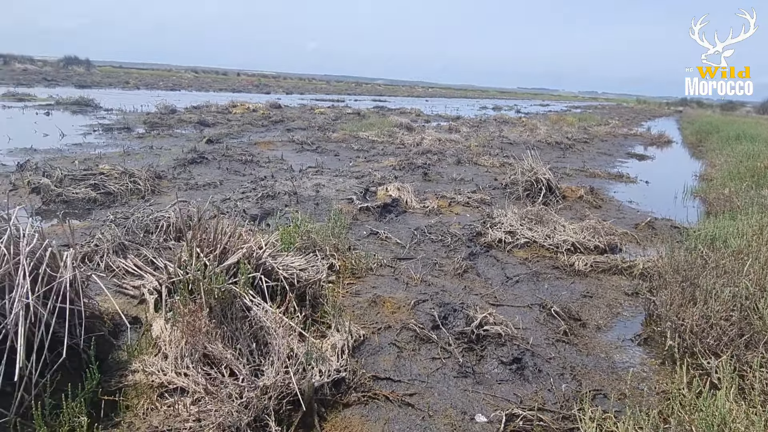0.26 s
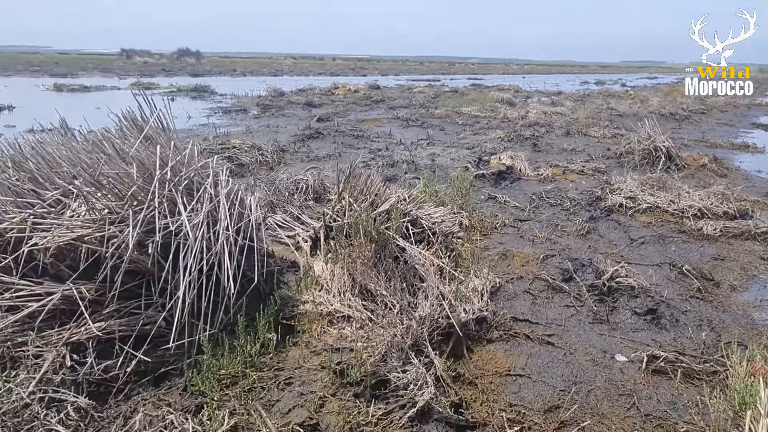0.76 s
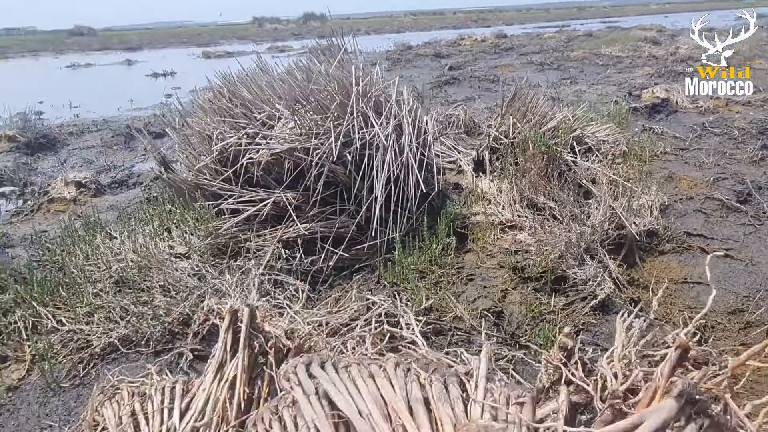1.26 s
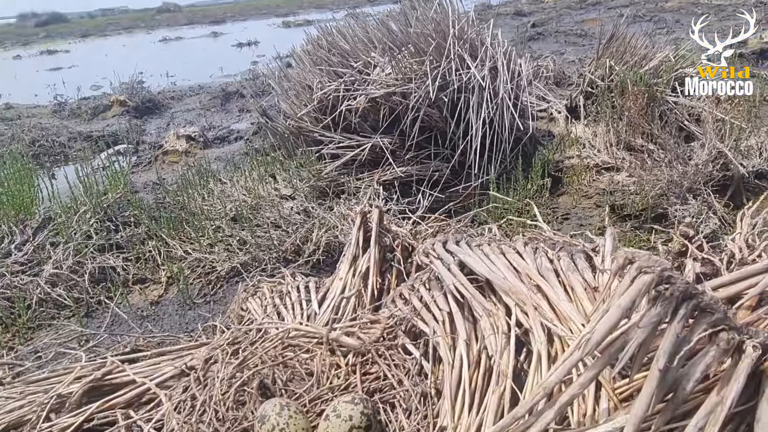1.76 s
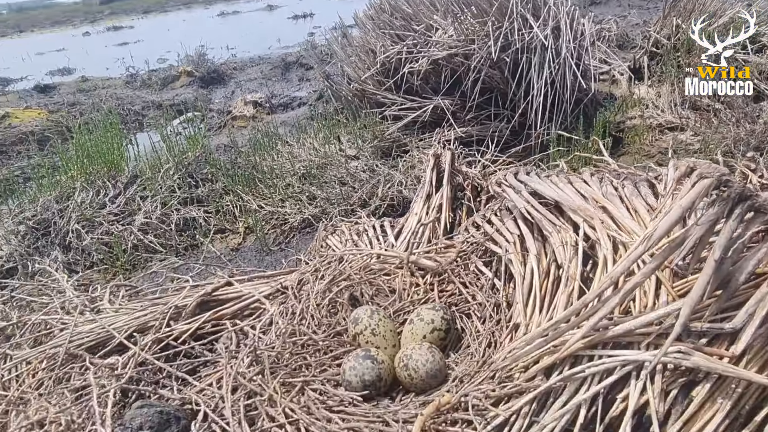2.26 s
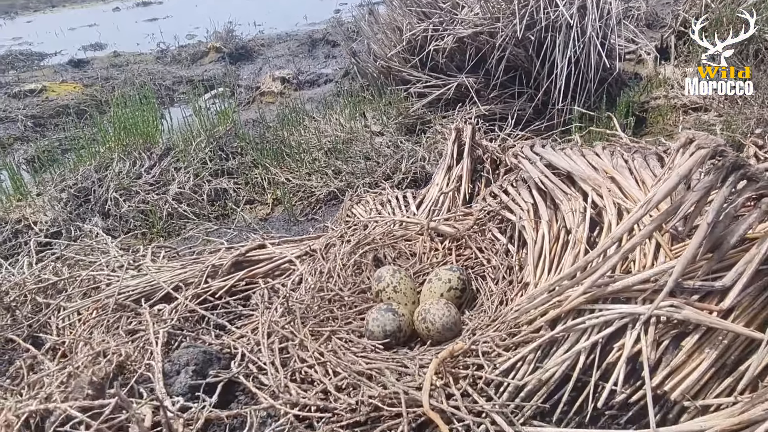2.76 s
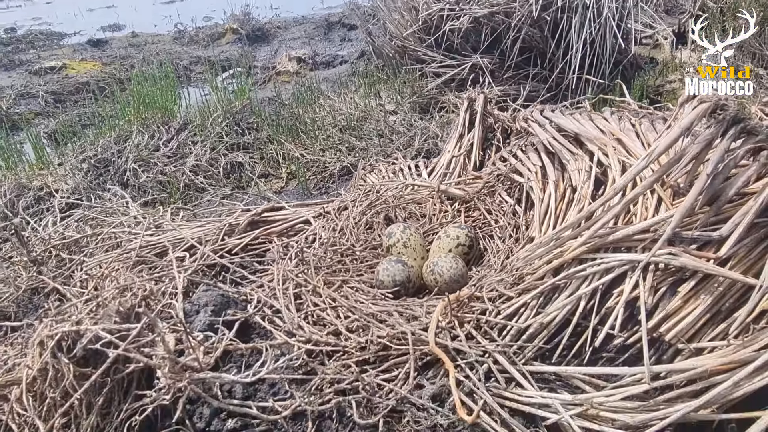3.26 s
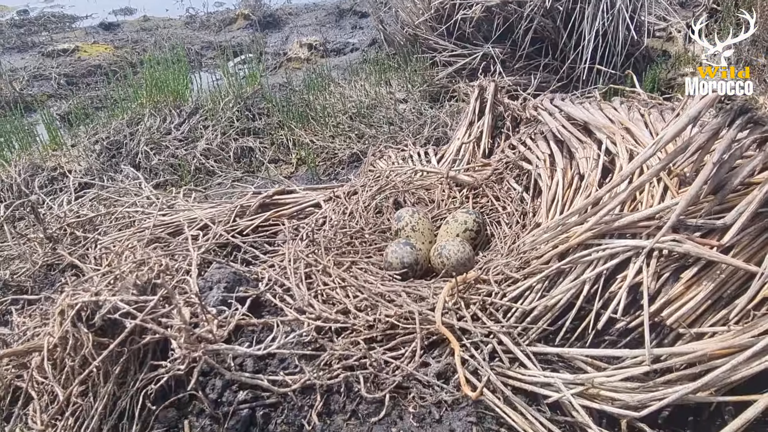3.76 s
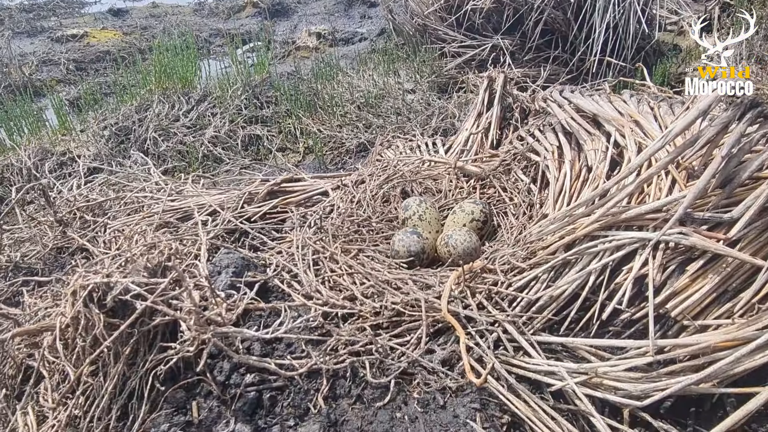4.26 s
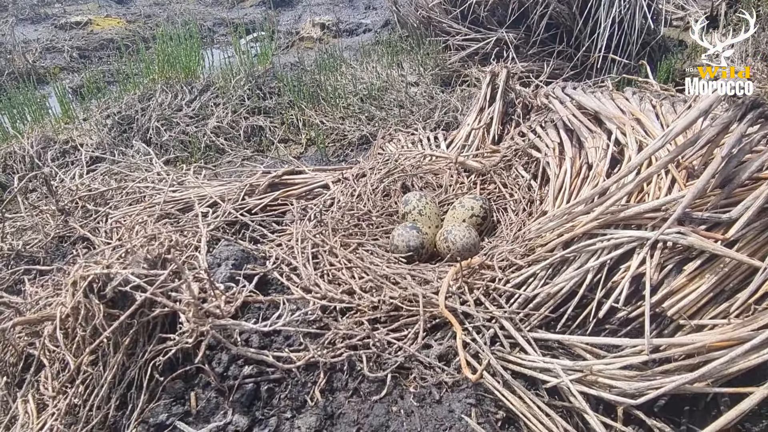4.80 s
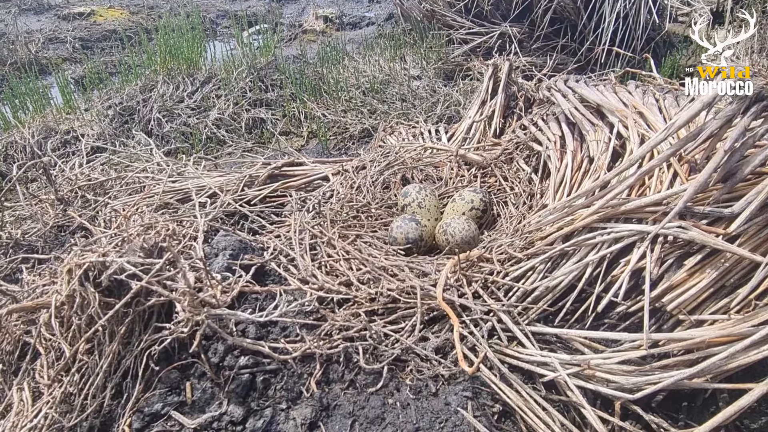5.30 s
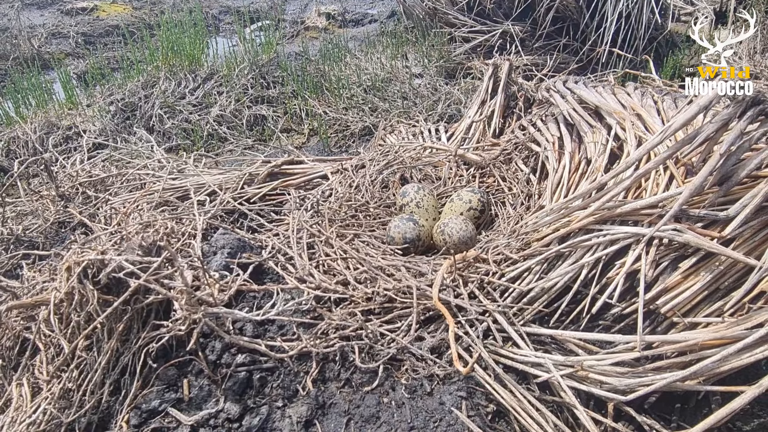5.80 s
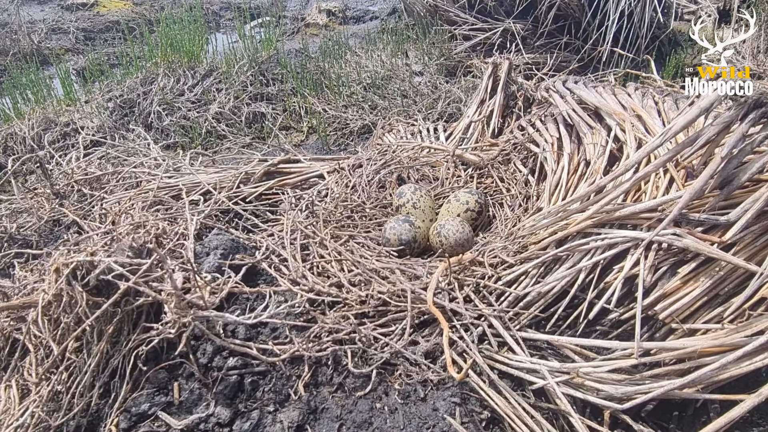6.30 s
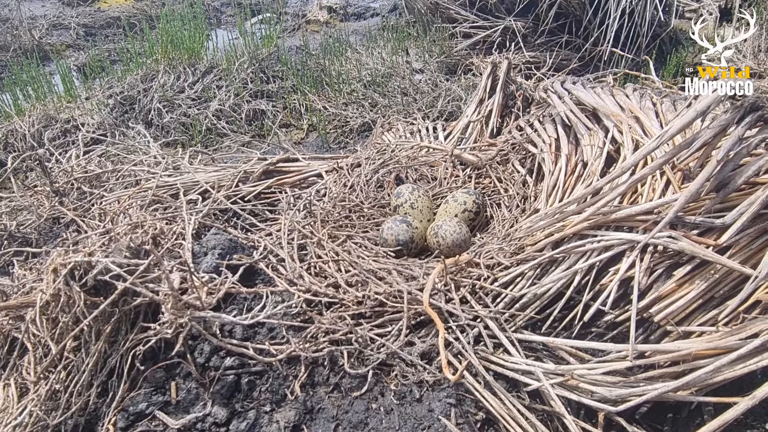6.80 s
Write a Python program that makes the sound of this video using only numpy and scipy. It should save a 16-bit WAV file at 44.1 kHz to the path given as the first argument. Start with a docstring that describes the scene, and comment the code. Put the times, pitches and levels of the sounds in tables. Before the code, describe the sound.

Across seven seconds in an open marsh, deep wind rumble and blunt buffets strike a hand-held microphone, strongest in the first 0.6 seconds, around 1.4 and 4.6, mostly on the right, easing between and towards the end. A lapwing straight ahead gives wheezy, nasal cries at about 0.4, 1.4, 2.0, 3.2, 5.0 and 5.6 seconds; each starts scratchy, arches in pitch and breaks into a brief rattle. Short falling croaks follow the first, third, fourth and fifth; the last cry is longest, rising again before its break. A farther wader repeats a thin whistle, quickly sliding down to a held note, roughly every half second with gaps near 3.4 and 5.3. Tiny birds chirp faintly, clearest at 5.6. Two dry ticks come at 2.1, soft low knocks at 2.3 and 2.4. Faint hiss switches on and off; reeds and mud slightly blur the calls.

```python
"""A lapwing gives six wheezy, arching cries over a marsh: harmonics that roughen into a rattle, four trailed by croaks.
A farther wader repeats a down-slurred whistle, a gliding sine; small birds chirp thinly, as bent and buzzing tones.
Wind rumbles and buffets in the two ports of a hand-held microphone, as shaped noise; far air is noise too.
Bands of recorder hiss switch on and off; there are two dry ticks and two low, short knocks.
Reeds and mud banks blur the birds."""
import sys
import numpy as np
from scipy import signal
from scipy.fft import rfft, irfft, next_fast_len
from scipy.io import wavfile
from scipy.ndimage import uniform_filter1d

SR = 44100
rng = np.random.default_rng(int(sys.argv[2]) if len(sys.argv) > 2 else 0)


def output_pcm(signal):
    """Save a mono or channel-first signal as 16-bit PCM at the path in sys.argv[1].

    Samples are clipped to [-1, 1] before scaling.
    """
    pcm = np.clip(np.atleast_2d(signal).T, -1, 1) * 32767
    wavfile.write(sys.argv[1], SR, np.round(pcm).astype(np.int16))


N = 310905


def gain_of(db):
    """Decibels to amplitude."""
    return 10 ** (np.asarray(db) / 20)


def evened(x):
    """Scales to rms 1."""
    return x / np.sqrt(np.mean(x ** 2) + 1e-20)


def read(points, hz):
    """A spectrum's gain at hz, interpolated in dB on a log-frequency axis."""
    f, db = np.transpose(points)
    return gain_of(np.interp(np.log(hz + 1), np.log(f), db))


def add(mix, start_s, sound):
    """Mixes a sound in at start_s, cropped to the mix."""
    at = round(start_s * SR)
    sound = sound[max(-at, 0):]
    part = mix[max(at, 0):][:len(sound)]
    part += sound[:len(part)]


def noise(size, colour):
    """Noise of rms 1 whose spectrum is colour(Hz)."""
    n = next_fast_len(size + 2048)
    spectrum = rfft(rng.standard_normal(n)) * colour(np.fft.rfftfreq(n, 1 / SR))
    return evened(irfft(spectrum, n)[:size])


def wander(size, hz):
    """Smooth random curve of rms 1, up to about hz."""
    return noise(size, lambda f: np.exp(-(f / hz) ** 2))


def fade(t, rise_s, fall_s):
    """Linear fade in and out."""
    return np.clip((t - t[0]) / rise_s, 0, 1) * np.clip((t[-1] - t) / fall_s, 0, 1)


def phase_of(hz):
    """Phase [rad] of a varying frequency."""
    return 2 * np.pi * np.cumsum(hz) / SR


def spells(events, rise_s, sag_db, fall_s):
    """Amplitude over time of events (start [s], length [s], level [dB]) that rise, sag and fall."""
    out = np.zeros(N)
    for start_s, length_s, db in events:
        t = np.arange(0, length_s, 1 / SR)
        add(out, start_s, gain_of(db + sag_db * t / length_s) * fade(t, rise_s, fall_s))
    return out


def recorder_hiss(edge_s=0.017, sag_db=-5):
    """Bands of recorder hiss that switch on and off with short fades, sagging meanwhile; alike in both channels."""
    # hiss spectrum: (frequency [Hz], relative density [dB])
    hiss_bands = [(1000, -27), (1400, 3.5), (2000, -1), (3600, -1.5), (4700, -3.5), (5700, 2.5),
                  (6900, 0.5), (7700, -19.5), (12000, -33.5)]
    # times when the hiss is on: (start [s], length [s], level [dB])
    openings = [(1.2, 0.38, -73), (2.77, 0.069, -79), (3.99, .29, -80), (4.55, 0.34, -79),
                (5.65, 0.67, -72.5), (6.41, 0.64, -69.5)]
    gain = spells(openings, edge_s, sag_db, edge_s) * gain_of(1.5 * wander(N, 30))
    return noise(N, lambda f: read(hiss_bands, f)) * gain


def marsh(air_db=-53, shared_hz=2200, shared_max=0.69):
    """Far air, unrelated between the ports in the bass and partly shared in the treble."""
    # open marsh spectrum: (frequency [Hz], relative density [dB])
    air_colour = [(30, 1), (80, -2), (250, -10.5), (500, -19), (1000, -25), (1900, -34), (2700, -36),
                  (4200, -41), (6500, -43.5), (7800, -48), (15000, -47)]
    f = np.fft.rfftfreq(N, 1 / SR)
    z = rfft(rng.standard_normal((3, N)))
    shared_power = shared_max * f ** 2 / (f ** 2 + shared_hz ** 2)
    mixed = z[:2] * np.sqrt(1 - shared_power) + z[2] * np.sqrt(shared_power)
    air = evened(irfft(mixed * read(air_colour, f), N))
    swell_db = 0.8 * wander(N, 5)
    return air * gain_of(air_db + swell_db)


def port_wind(port, gust_rise_s=0.023, gust_sag_db=-3, gust_fall_s=0.044):
    """Wind strength [dB] at one port over time: gusts ride on the breeze, added in power."""
    # breeze between gusts: (time [s], left strength [dB], right strength [dB])
    breeze_points = [(-0.0, -38, -27), (0.66, -39, -33), (1.33, -42, -32), (1.65, -39, -40),
                     (2.05, -56, -47), (2.54, -42, -39), (2.61, -49, -44), (3.11, -47, -40),
                     (3.49, -38, -42), (3.82, -56, -48), (4.05, -42, -31), (4.33, -47, -44),
                     (4.81, -33, -26), (5.56, -46, -37), (6.08, -47, -41), (6.74, -52, -46),
                     (6.95, -47, -48)]
    # gusts: (start [s], length [s], left strength [dB], right strength [dB])
    gust_events = [(-0.01, 0.25, -35, -16), (0.24, 0.34, -29, -19), (0.69, 0.08, -28, -39),
                   (0.86, 0.15, -34, -26), (1.31, 0.12, -42, -16), (1.43, 0.17, -46, -22),
                   (1.71, 0.17, -46, -28), (2.15, 0.24, -46, -31), (2.71, 0.26, -37, -30),
                   (3.36, 0.14, -40, -26), (4.04, 0.18, -26, -34), (4.53, 0.17, -42, -16),
                   (4.77, 0.27, -30, -26), (5.3, 0.13, -35, -29), (5.48, 0.1, -46, -25),
                   (5.71, 0.14, -53, -28), (6.24, 0.18, -36, -33), (6.38, 0.13, -39, -24)]
    s, *breeze_db = np.transpose(breeze_points)
    breeze = gain_of(np.interp(np.arange(N) / SR, s, breeze_db[port]))
    port_gusts = [(start_s, length_s, db[port]) for start_s, length_s, *db in gust_events]
    gusts = spells(port_gusts, gust_rise_s, gust_sag_db, gust_fall_s)
    return 20 * np.log10(np.hypot(breeze, gusts))


def rumble(wind_db, edge_hz=230, edge_wind_db=-31.5, db_per_decade=44, lumps_db=3):
    """Turbulence in one port: the stronger the wind, the smaller the eddies and the higher it reaches."""
    # wind in a port: (frequency [Hz], relative density [dB])
    rumble_colour = [(8, -34), (22, -20), (40, -1), (70, 5), (95, -1.5), (125, -8.5), (200, -11.5),
                     (350, -14.5), (700, -34)]
    f, t, z = signal.stft(rng.standard_normal(N), SR, nperseg=2048, noverlap=1536)
    f = f[:, None]
    frame_db = np.interp(t * SR, np.arange(N), wind_db)
    edge = edge_hz * 10 ** ((frame_db - edge_wind_db) / db_per_decade)
    z *= read(rumble_colour, f) / np.sqrt(1 + (f / edge) ** 6)
    x = signal.istft(z, SR, nperseg=2048, noverlap=1536)[1][:N]
    x /= np.sqrt(uniform_filter1d(x ** 2, size=2500) + 1e-20)  # flatten the level before shaping it
    return x * gain_of(wind_db) * evened(gain_of(lumps_db * wander(N, 11.8)))


def wind(rumble_db=0.42, leak_db=-9.0, leak_hz=190, spikes_db=4, eddy_low_hz=170):
    """Rumble and spiky buffets per port, softly clipped; their upper part leaks across, weaker and inverted."""
    # eddies striking a port: (time [s], length [s], level [dB], corner [Hz], port [0 left, 1 right])
    buffets = [(0.041, 0.011, -17, 308, 1), (0.069, 0.057, -14, 460, 1), (0.139, 0.021, -14.5, 408, 1),
               (0.176, 0.019, -11.5, 443, 1), (0.26, 0.013, -28, 370, 1), (0.365, 0.026, -14.5, 377, 1),
               (0.44, 0.096, -19, 240, 1), (0.534, 0.023, -15, 374, 1), (0.653, 0.0093, -41, 585, 1),
               (0.711, 0.019, -38.5, 367, 1), (0.894, 0.018, -33.5, 366, 1), (1.031, 0.0081, -25.5, 320, 1),
               (1.042, 0.0084, -19.5, 720, 0), (1.317, 0.017, -14, 298, 1), (1.353, 0.03, -18, 280, 1),
               (1.444, 0.037, -21.5, 274, 1), (3.118, 0.0075, -35.5, 272, 1),
               (3.346, 0.0087, -33.5, 746, 0), (3.401, 0.015, -44, 386, 1), (4.089, 0.018, -31.5, 310, 0),
               (4.247, 0.0064, -28, 610, 0), (4.548, 0.028, -15, 346, 1), (4.594, 0.027, -15, 306, 1),
               (4.621, 0.014, -14.5, 395, 1), (4.79, 0.032, -21, 181, 1), (5.506, 0.031, -35, 265, 1),
               (5.785, 0.026, -37.5, 213, 1), (6.424, .03, -31, 275, 1), (6.446, 0.0079, -26.5, 774, 0)]
    ports = np.array([gain_of(rumble_db) * rumble(port_wind(port)) for port in range(2)])
    for start_s, length_s, db, corner_hz, port in buffets:
        n = int((length_s + 0.0024) * SR)

        def colour(f):
            low_cut = f ** 2 / (f ** 2 + eddy_low_hz ** 2)
            return low_cut / (1 + (f / corner_hz) ** 2) / np.sqrt(1 + (f / corner_hz / 1.574) ** 7)

        eddy = noise(n, colour) * gain_of(spikes_db * wander(n, 130))
        eddy *= signal.windows.tukey(n, min(0.0082 / length_s, 1))
        add(ports[int(port > 0.5)], start_s - 0.002, gain_of(db) * evened(eddy))
    ports = np.tanh(ports)  # soft overload
    f = np.fft.rfftfreq(N, 1 / SR)
    upper = irfft(rfft(ports) * f ** 4 / (f ** 4 + leak_hz ** 4), N)
    return ports - gain_of(leak_db) * upper[::-1]


def ticks(decay_s=0.00098):
    """Dry bright snaps close by: decaying noise bursts."""
    # (time [s], level before decay [dB])
    snaps = [(2.070, -41), (2.080, -42)]
    colour = [(3000, -32), (5000, 5), (15000, -2)]  # (frequency [Hz], gain [dB])
    out = np.zeros(N)
    t = np.arange(300) / SR
    for start_s, db in snaps:
        burst = noise(len(t), lambda f: read(colour, f))
        add(out, start_s, gain_of(db) * burst * np.exp(-t / decay_s))
    return out


def bent_tones(events, buzz=0.056):
    """Single tones bend through three pitches, blurred by a fast random buzz."""
    out = np.zeros(N)
    for start_s, length_s, first_hz, middle_hz, last_hz, db, rough in events:
        t = np.arange(0, length_s, 1 / SR)
        bend = np.polyfit([0, 0.5, 1], [first_hz, middle_hz, last_hz], 2)
        hz = np.polyval(bend, t / length_s)
        phase = phase_of(hz * (1 + buzz * rough * wander(len(t), 700)))
        tone = np.sin(phase) * gain_of(3.8 * wander(len(t), 70)) * fade(t, length_s / 4, length_s / 4)
        add(out, start_s, gain_of(db) * evened(tone))
    return out


def knocks():
    """Two low, short knocks: brief buzzing tones near 1.5 kHz."""
    # (time [s], length [s], first [Hz], middle [Hz], last [Hz], level [dB], roughness [0-1])
    low_knocks = [(1.005, 0.024, 2070, 2230, 2500, -64, 0.8), (1.213, .2, 5220, 5530, 5430, -73, 0.74),
                  (1.85, 0.11, 3350, 3132, 2900, -76.5, 0.15), (2.493, 0.094, 7500, 6230, 5400, -76, 0.3),
                  (2.608, 0.07, 5900, 6750, 6300, -73, 0.1), (4.438, .18, 2370, 2420, 2370, -78, 0.06),
                  (4.579, 0.079, 7200, 6400, 5630, -71.5, 0.74), (4.752, 0.08, 7200, 6200, 5030, -76.5, .7),
                  (4.932, 0.04, 7200, 6660, 5900, -80, .7), (5.637, 0.081, 5920, 6670, 6320, -55.5, 0.15),
                  (5.84, 0.071, 8000, 6330, 5000, -68, 0.7), (5.96, .1, 5900, 6500, 6600, -71, 0.4),
                  (6.5, 0.16, 4030, 4260, 3930, -74, 0.13), (6.622, .06, 4100, 3700, 3100, -67.5, .1),
                  (6.623, 0.06, 7550, 6550, 5100, -70.5, 0.7), (6.743, 0.11, 4200, 3970, 3220, -76.5, 0.5),
                  (2.319, 0.017, 1460, 1590, 1620, -57.5, 0.9), (2.412, 0.016, 1450, 1470, 1450, -67, .5)][-2:]
    return bent_tones(low_knocks)


def small_birds():
    """Thin chirps: single bent tones."""
    # (time [s], length [s], first [Hz], middle [Hz], last [Hz], level [dB], roughness [0-1])
    chirps = [(1.005, 0.024, 2070, 2230, 2500, -64, 0.8), (1.213, .2, 5220, 5530, 5430, -73, 0.74),
              (1.85, 0.11, 3350, 3132, 2900, -76.5, 0.15), (2.493, 0.094, 7500, 6230, 5400, -76, 0.3),
              (2.608, 0.07, 5900, 6750, 6300, -73, 0.1), (4.438, .18, 2370, 2420, 2370, -78, 0.06),
              (4.579, 0.079, 7200, 6400, 5630, -71.5, 0.74), (4.752, 0.08, 7200, 6200, 5030, -76.5, .7),
              (4.932, 0.04, 7200, 6660, 5900, -80, .7), (5.637, 0.081, 5920, 6670, 6320, -55.5, 0.15),
              (5.84, 0.071, 8000, 6330, 5000, -68, 0.7), (5.96, .1, 5900, 6500, 6600, -71, 0.4),
              (6.5, 0.16, 4030, 4260, 3930, -74, 0.13), (6.622, .06, 4100, 3700, 3100, -67.5, .1),
              (6.623, 0.06, 7550, 6550, 5100, -70.5, 0.7), (6.743, 0.11, 4200, 3970, 3220, -76.5, 0.5),
              (2.319, 0.017, 1460, 1590, 1620, -57.5, 0.9), (2.412, 0.016, 1450, 1470, 1450, -67, .5)][:-2]
    return bent_tones(chirps)


def wader(slur_hz=560, slur_s=0.026, head_s=0.022, lift_hz=55, octave_db=-26, flick_s=0.01,
          flick_hz_per_s=110000):
    """Two quick rising flicks, a slide down onto a pure held note and a small lift at the end."""
    # (time [s], length [s], held pitch [Hz], head level [dB], held level [dB])
    whistles = [(-.005, 0.27, 2176, -57.5, -59.5), (0.527, 0.23, 2200, -55, -63.5),
                (1.018, 0.23, 2213, -70, -64.5), (1.509, 0.31, 2243, -58, -67),
                (2.018, 0.22, 2220, -68, -67.5), (2.49, .25, 2260, -61, -69.5),
                (2.954, 0.21, 2266, -55, -72), (3.829, 0.23, 2270, -51.5, -66),
                (4.264, 0.227, 2238, -52, -62.5), (4.738, 0.24, 2204, -55, -61),
                (5.848, .27, 2190, -74, -68), (6.385, 0.26, 2223, -52.5, -68.5),
                (6.889, 0.25, 2220, -48, -68)]
    # opening flicks: (lead [s], first pitch [Hz], peak against the head level [dB])
    flicks = [(.015, 2460, -8), (0.0097, 2050, -6)]
    out = np.zeros(N)
    for start_s, length_s, held_hz, head_db, held_db in whistles:
        t = np.arange(0, length_s, 1 / SR)
        hz = held_hz + slur_hz * np.exp(-t / slur_s) + lift_hz * (t / length_s) ** 6
        phase = phase_of(hz + 5 * wander(len(t), 80))
        head = np.exp(-(t / head_s) ** 2 / 2)
        db = held_db + (head_db - held_db) * head + 1.9 * wander(len(t), 27)
        tone = np.sin(phase) + gain_of(octave_db) * head * np.sin(2 * phase)
        add(out, start_s, np.sqrt(2) * gain_of(db) * tone * fade(t, 0.0061, 0.004))
        t = np.arange(0, flick_s, 1 / SR)
        for lead_s, first_hz, flick_db in flicks:
            phase = phase_of(first_hz + flick_hz_per_s * t + 100 * wander(len(t), 700))
            flick = np.sin(phase) * fade(t, 0.0052, 0.0007)
            add(out, start_s - lead_s, gain_of(head_db + flick_db) * flick)
    return out


def syrinx(rows, reach_hz, throat_length=1, waver=0.0027, jitter=0.044, rattle_hz=150, rattle_db=8, rasp_db=-6,
           wheeze_db=-35, shimmer_db=1.4, voice_db=-0.5, dulling=0.52):
    """Harmonics through the throat; when rough, the membranes stutter and the tone frays into hiss.

    rows: (time [s], pitch [Hz], body [dB], fundamental [dB], treble [dB], roughness [0-1]), before voice_db."""
    # throat resonances: (frequency [Hz], gain [dB])
    throat = [(1000, -16.5), (2100, -5), (2800, 2.5), (3400, 9.5), (4000, 0), (4550, 0), (4950, -13.5),
              (5800, -7.5), (7400, -7), (8700, -15), (10600, -3), (11900, -6.5), (12700, -11.5),
              (15300, -14)]
    # syrinx spectrum, favouring the third harmonic: (multiple of the pitch, gain [dB])
    overtone_gains = [(2, -2), (3, 8.5), (4, 1.5), (5, 3), (6, 4), (8, 1.5), (14, -21.5)]
    s, *columns = np.transpose(rows)
    t = np.arange(s.min(), s.max(), 1 / SR)
    n = len(t)
    hz, body_db, first_db, treble_db, rough = (np.interp(t, s, c) for c in columns)
    rough = np.clip(rough, 0, 1)
    hz = uniform_filter1d(hz, size=250, mode="nearest")
    reach = reach_hz * (hz / hz.max()) ** dulling  # slack membranes make fewer overtones
    hz = hz * (1 + waver * wander(n, 130) + jitter * rough * wander(n, 450))
    phase = phase_of(hz)

    k = np.arange(2, 15)[:, None]
    weight = read(throat, k * hz * throat_length) * gain_of(np.interp(k, *np.transpose(overtone_gains)))
    weight /= 1 + (k * hz / reach) ** 40
    high = np.clip((k * hz - 4700) / 600, 0, 1)  # crossover from body to treble
    body = weight * (1 - high)
    treble = weight * high
    body /= np.linalg.norm(body, axis=0)
    treble /= np.linalg.norm(treble, axis=0)
    shimmer = gain_of(shimmer_db * np.array([wander(n, 25) for _ in k]))
    overtones = (body * gain_of(body_db) + treble * gain_of(treble_db)) * shimmer * np.cos(k * phase)
    fundamental = gain_of(first_db + shimmer_db * wander(n, 55)) * np.cos(phase)
    tone = np.sqrt(2) * (overtones.sum(0) + fundamental)

    def hiss_colour(f):
        low_cut = f ** 2 / (f ** 2 + 5500 ** 2)
        return read(throat, f) ** 1.3 * low_cut / (1 + (f / reach.min()) ** 20)

    hiss = noise(n, hiss_colour) * gain_of(treble_db + 4.5)
    hiss *= gain_of(wheeze_db) + gain_of(rasp_db) * rough
    stutter = gain_of(rattle_db * rough * (np.tanh(2 * wander(n, rattle_hz)) - 0.32))
    return s.min(), gain_of(voice_db) * (tone + hiss) * stutter * fade(t, 0.001, 0.001)


def cry(pitch, scratch_s, rattle_s, db, swell_db, first_db, treble_db, reach_hz, throat_length):
    """Opens with a scratch, arches in pitch on a clear tone, then breaks into a dying rattle."""
    attack_s, attack_db, release_db_per_s = 0.009, -26, -160
    first_share, treble_share = 0.7, 0.35  # of the effort envelope
    treble_db_per_octave = 19.5  # brightens with pitch
    scratch_rough, rattle_rough, break_s, glide_s = 0.9, 0.95, 0.014, 0.0037
    start_s, end_s = pitch[0][0], pitch[-1][0]
    t = np.arange(0, end_s - start_s, 1 / SR)
    clear_s = end_s - start_s - rattle_s
    hz = np.interp(start_s + t, *np.transpose(pitch))
    hz = uniform_filter1d(hz, size=round(glide_s * SR) + 1, mode="nearest")
    along = np.minimum(t / clear_s, 1)
    broken_s = np.maximum(t - clear_s, 0)
    effort_db = attack_db * np.exp(-t / attack_s) + release_db_per_s * broken_s
    body_db = db + effort_db + swell_db * (along - 0.5)
    low_db = first_db + first_share * effort_db
    bright_db = treble_db + treble_share * effort_db + treble_db_per_octave * np.log2(hz / hz.max())
    rough = scratch_rough * np.maximum(1 - t / scratch_s, 0) + rattle_rough * np.minimum(broken_s / break_s, 1)
    rows = np.transpose([start_s + t, hz, body_db, low_db, bright_db, rough])
    return syrinx(rows, reach_hz, throat_length)


def lapwing(croak_reach_hz=8200):
    """The cries, and the short, duller croaks that trail four of them, each sinking as it dies."""
    # voice per cry, levels before envelope and voice trim: (scratch [s], rattle [s], body [dB], swell [dB],
    # fundamental [dB], treble [dB], overtone reach [Hz], throat length [factor])
    voices = [(0.049, 0.037, -39, -4, -56, -46.5, 11700, 0.99),
              (0.037, 0.059, -42, -1, -48.5, -51, 14000, 1),
              (0.022, .033, -46.5, 8.5, -57.5, -54.5, 12500, 1.04),
              (0.038, 0.051, -46, -10.5, -50, -57.5, 11800, 0.973),
              (0.025, 0.051, -50, -7, -52, -57, 11900, 0.994),
              (0.019, .025, -46, -4, -54.5, -49, 18000, 1.06)]
    # pitch track per cry: (time [s], pitch [Hz])
    cry_pitches = [
        [(0.362, 1124), (0.368, 1121), (0.384, 1245), (0.426, 1415), (0.462, 1499), (0.516, 1488),
         (0.544, 1455), (0.56, 1402), (0.578, 1208), (0.602, 1218)],
        [(1.398, 936), (1.448, 1102), (1.524, 1254), (1.572, 1318), (1.71, 1356), (1.748, 1329), (1.772, 1268),
         (1.784, 1137), (1.818, 1043), (1.826, 1046)],
        [(2.0, 988), (2.018, 1059), (2.08, 1096), (2.126, 1094), (2.164, 1118), (2.224, 1230), (2.25, 1222),
         (2.26, 1197), (2.274, 1074), (2.286, 1030), (2.305, 1095)],
        [(3.22, 1003), (3.228, 1126), (3.236, 1215), (3.272, 1429), (3.308, 1521), (3.348, 1532), (3.398, 1444),
         (3.412, 1403), (3.422, 1305), (3.468, 1274)],
        [(5.046, 1027), (5.07, 1278), (5.104, 1440), (5.134, 1517), (5.15, 1533), (5.18, 1523), (5.212, 1469),
         (5.226, 1424), (5.264, 1223), (5.285, 1260)],
        [(5.641, 961), (5.679, 1116), (5.759, 1280), (5.821, 1377), (5.869, 1413), (5.983, 1391), (6.159, 1532),
         (6.175, 1496), (6.187, 1399), (6.203, 1116), (6.218, 1089)],
    ]
    # (time [s], length [s], first pitch [Hz], reference level [dB], roughness [0-1])
    croaks = [(0.606, 0.0091, 1156, -47, .9), (0.616, 0.0047, 1190, -43, 0.6),
              (0.634, 0.0079, 1140, -56, .9), (0.642, 0.0055, 1150, -49.5, .4),
              (0.665, 0.026, 1030, -40.5, 0.42), (0.718, 0.028, 958, -45.5, 0.4),
              (2.3, .052, 1064, -57.5, 0.94), (2.35, 0.058, 850, -60, 0.1), (3.507, .007, 1070, -55.5, .5),
              (3.522, 0.038, 1032, -48.5, 0.33), (3.571, 0.044, 954, -59.5, 0.9),
              (5.316, 0.0071, 1100, -62, 0.7), (5.331, 0.019, 1014, -51.5, 0.1),
              (5.352, 0.01, 1010, -54.5, 0.14), (5.399, 0.022, 953, -59, 0.34)]
    out = np.zeros(N)
    for pitch, voice in zip(cry_pitches, voices):
        add(out, *cry(pitch, *voice))
    for start_s, length_s, hz, db, rough in croaks:
        start = (start_s, hz, db - 5.5, db - 8.0, db - 20.5, rough)
        held = (start_s + 0.69 * length_s, hz * 0.962, db - 0.5, db - 8.5, db - 19.0, rough)
        end = (start_s + length_s, hz * 0.94, db - 11, db - 20, db - 26, rough)
        add(out, *syrinx([start, held, end], croak_reach_hz))
    return out


def scatter(x, t60_s=0.42):
    """Faint, dull echoes from reeds and mud banks: decaying noise tails, one per port."""
    # (frequency [Hz], gain [dB])
    colour = [(900, 5.0), (1350, 10.0), (2200, -3.0), (3500, -20.5), (6000, -23), (12000, -43.5)]
    t = np.arange(SR // 2) / SR
    tails = np.array([noise(len(t), lambda f: read(colour, f)) for _ in range(2)])
    tails *= gain_of(-60 * t / t60_s) * np.minimum(t / 0.01, 1)
    return signal.fftconvolve(x[None], tails / np.linalg.norm(tails[0]), axes=1)[:, :N]


def reeds(x, decay_s=0.014, level_db=-19):
    """Stems close by smear each sound for a few hundredths of a second."""
    t = np.arange(0, 0.08, 1 / SR)
    taps = rng.standard_normal((2, len(t))) * np.exp(-t / decay_s) * np.minimum(t / 0.0035, 1)
    return gain_of(level_db) * signal.fftconvolve(x[None], taps / np.linalg.norm(taps[0]), axes=1)[:, :N]


def scene(left_lead_s=2e-6):
    """Birds almost straight ahead over open ground, wind at the microphone, hiss from the recorder."""
    background = recorder_hiss() + marsh() + wind() + ticks()
    others = knocks() + small_birds() + wader()
    near = lapwing()
    echoes = scatter(gain_of(-23.5) * near + gain_of(-20.5) * others)
    # half the lead as an advance on the left, half as a delay on the right
    turn = np.exp(1j * np.pi * np.fft.rfftfreq(N, 1 / SR) * left_lead_s)
    direct = irfft(rfft(near + others) * np.array([turn, 1 / turn]), N)
    return background + echoes + reeds(near + others) + direct


def record(dry, edge_hz=15500):
    """The recorder's band limit: a linear-phase low-pass."""
    low_pass = signal.firwin(511, edge_hz, window=("kaiser", 9), fs=SR)
    return signal.oaconvolve(dry, low_pass[None], "same")


dry = scene()
out = record(dry)
output_pcm(out)
```